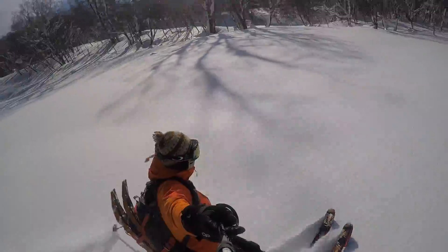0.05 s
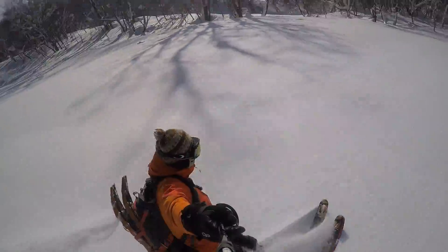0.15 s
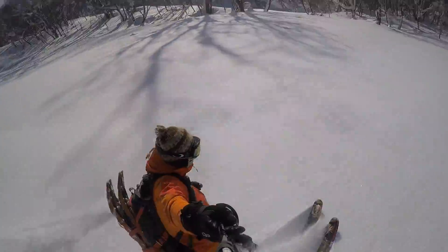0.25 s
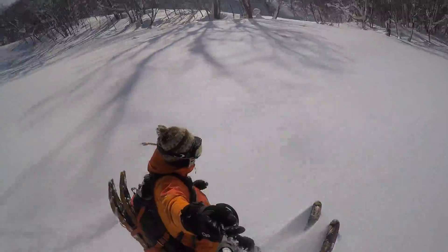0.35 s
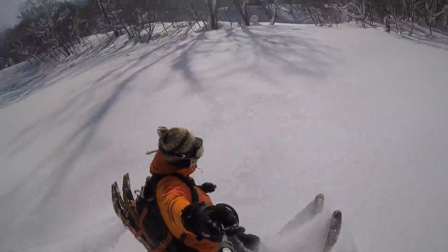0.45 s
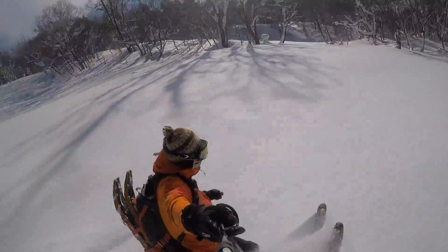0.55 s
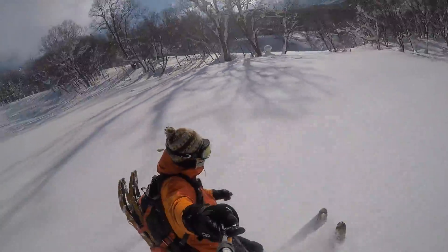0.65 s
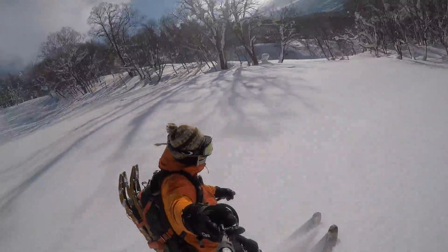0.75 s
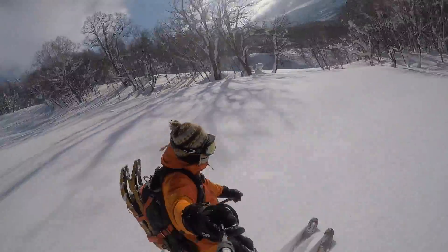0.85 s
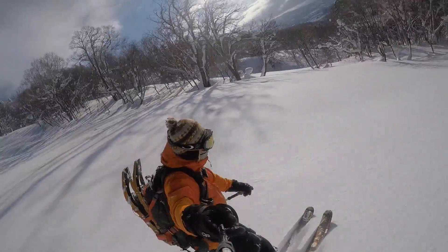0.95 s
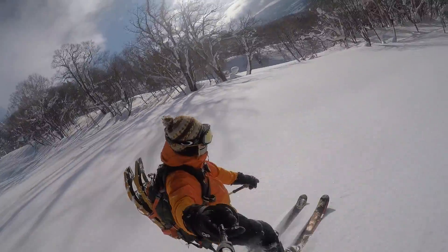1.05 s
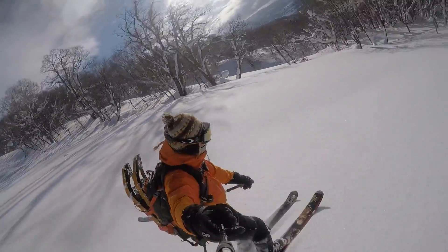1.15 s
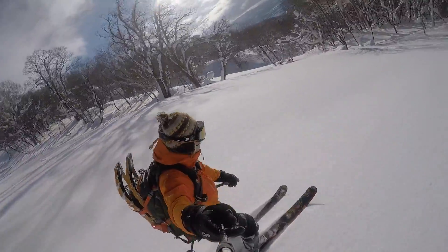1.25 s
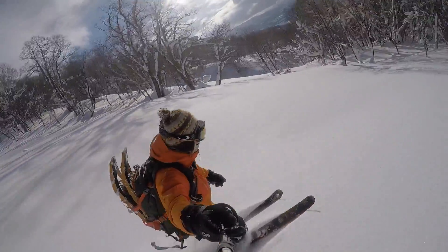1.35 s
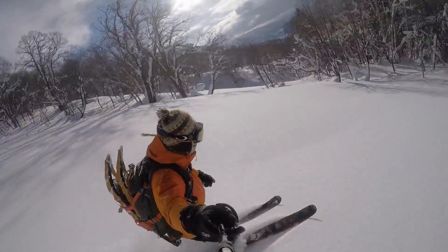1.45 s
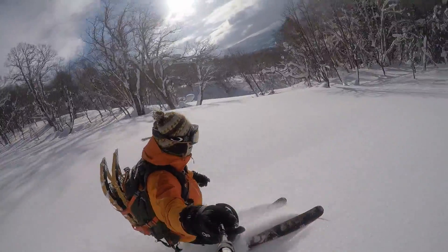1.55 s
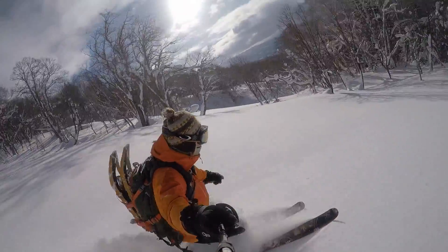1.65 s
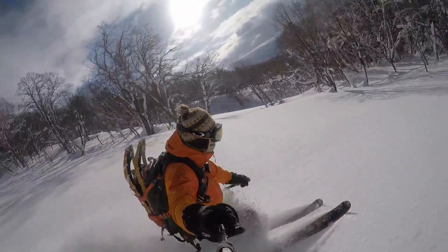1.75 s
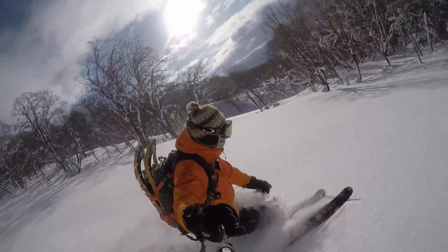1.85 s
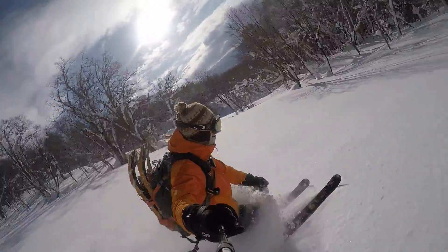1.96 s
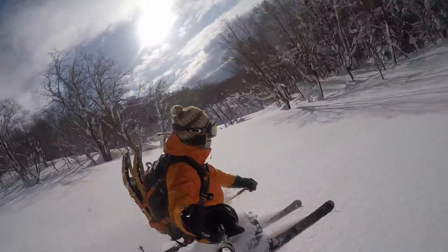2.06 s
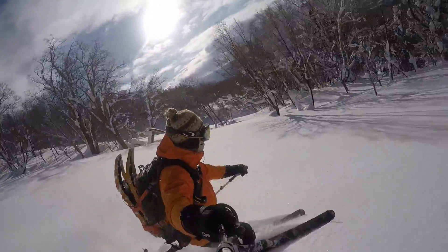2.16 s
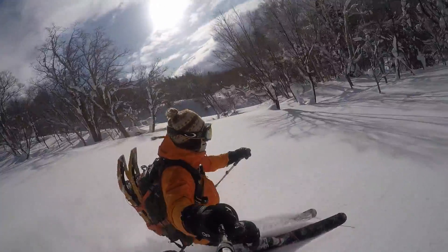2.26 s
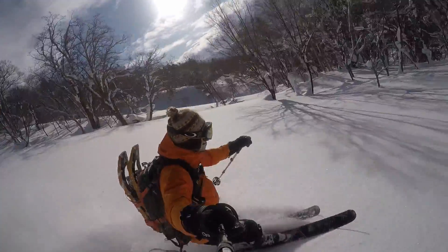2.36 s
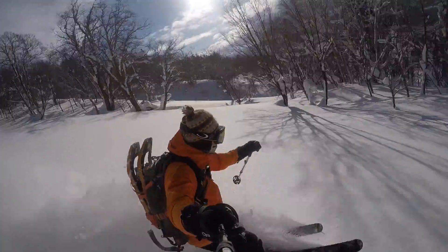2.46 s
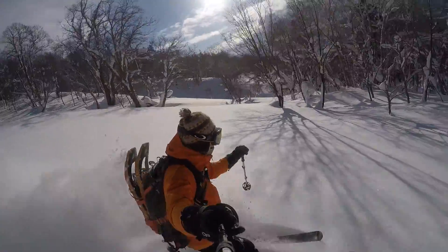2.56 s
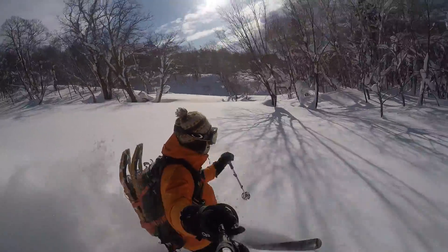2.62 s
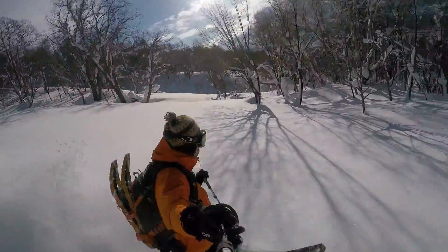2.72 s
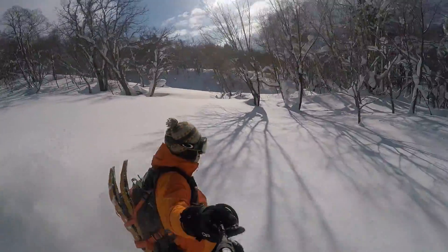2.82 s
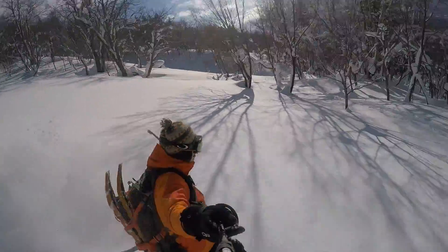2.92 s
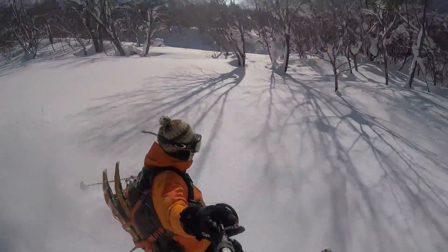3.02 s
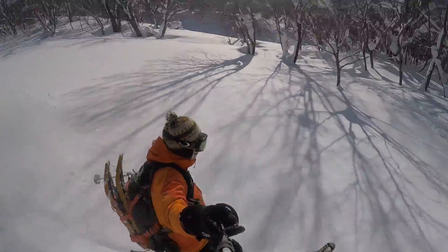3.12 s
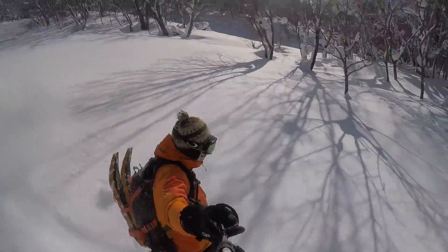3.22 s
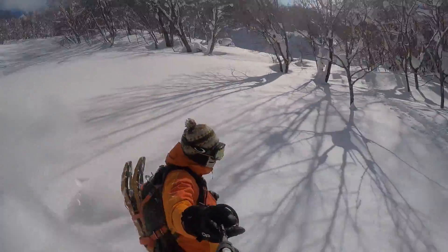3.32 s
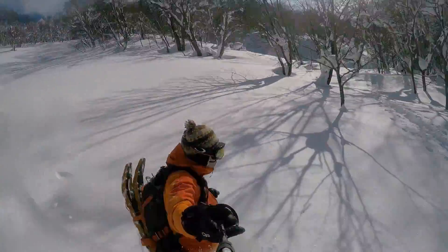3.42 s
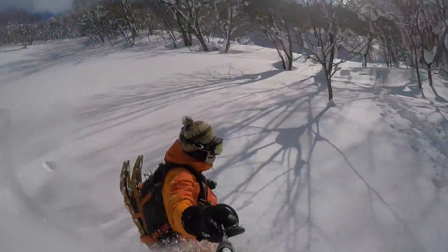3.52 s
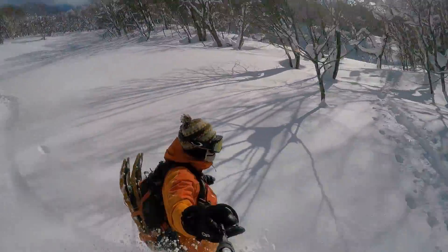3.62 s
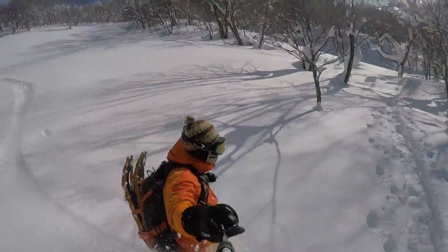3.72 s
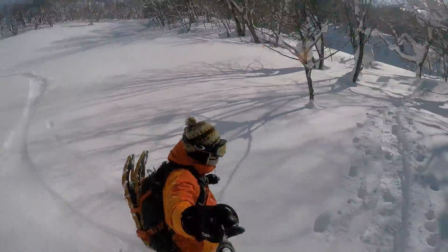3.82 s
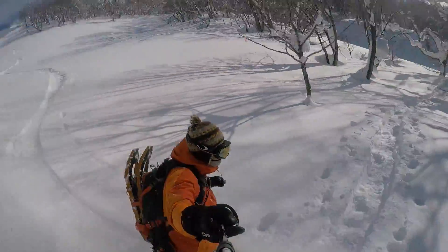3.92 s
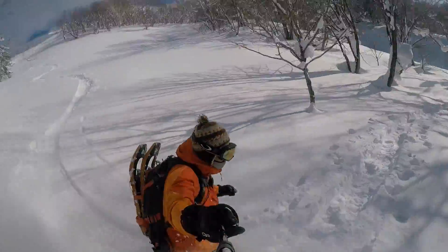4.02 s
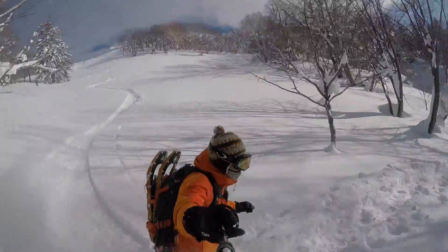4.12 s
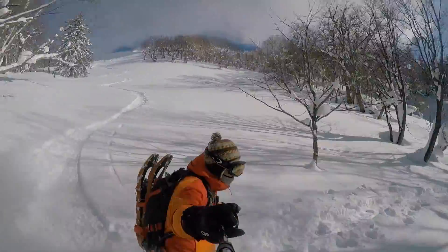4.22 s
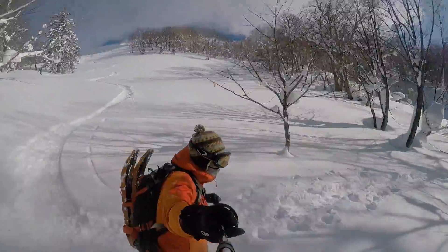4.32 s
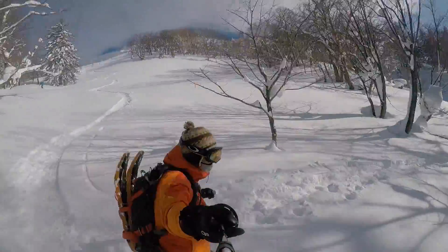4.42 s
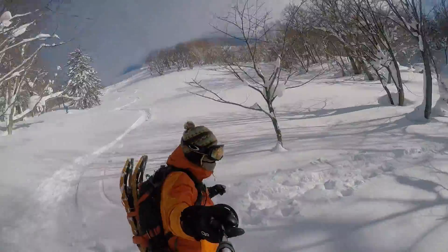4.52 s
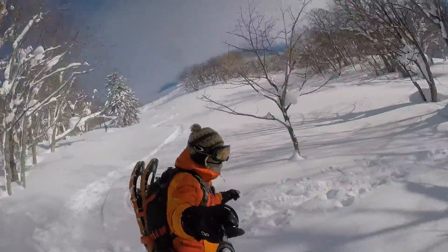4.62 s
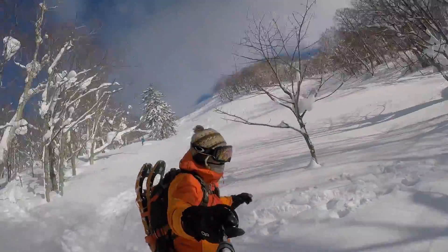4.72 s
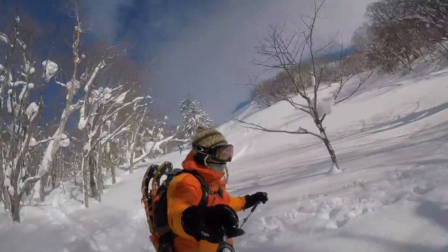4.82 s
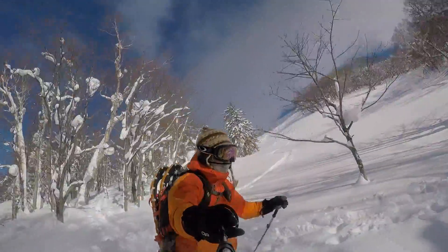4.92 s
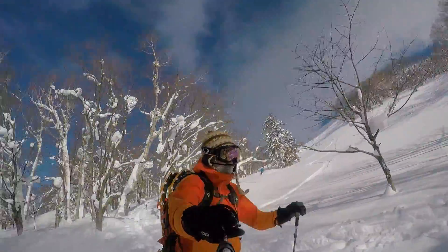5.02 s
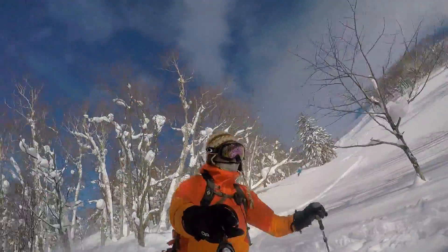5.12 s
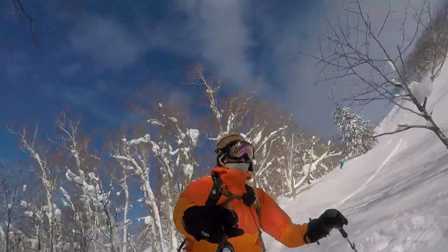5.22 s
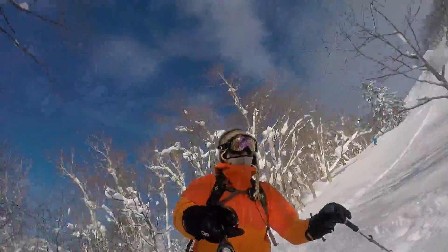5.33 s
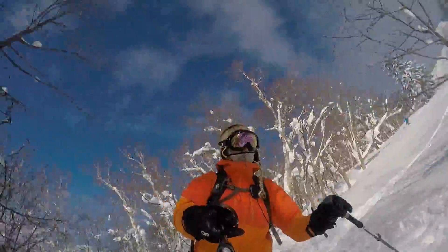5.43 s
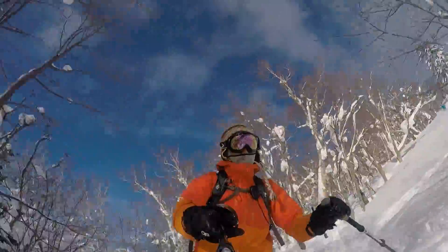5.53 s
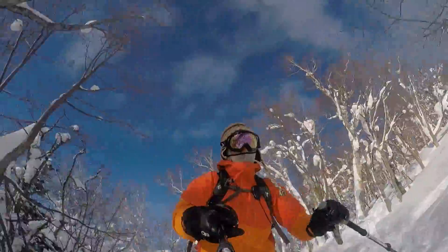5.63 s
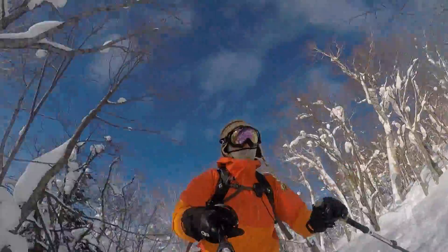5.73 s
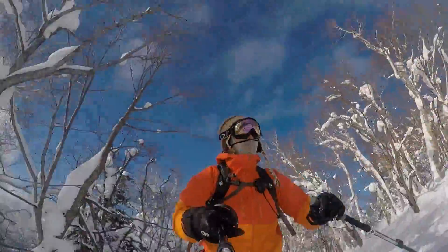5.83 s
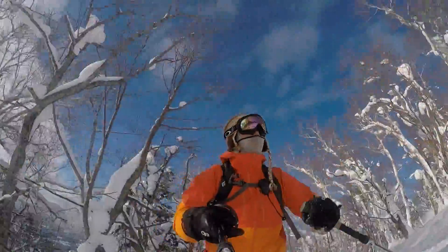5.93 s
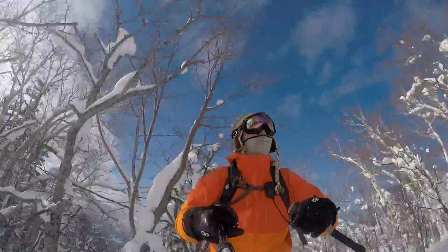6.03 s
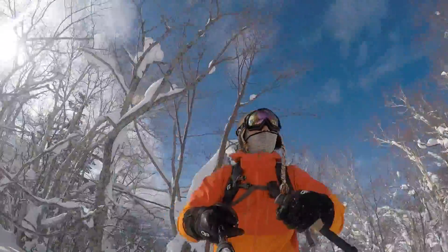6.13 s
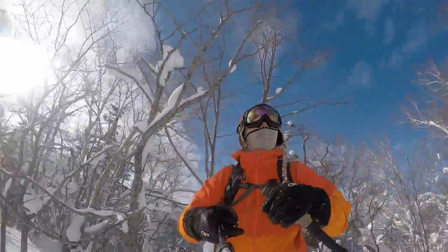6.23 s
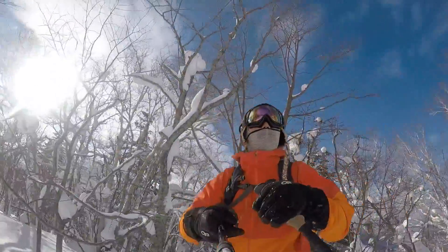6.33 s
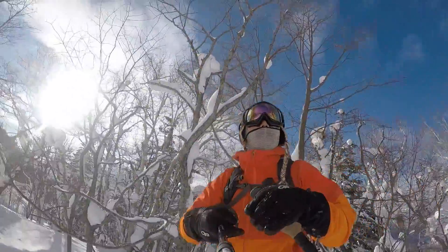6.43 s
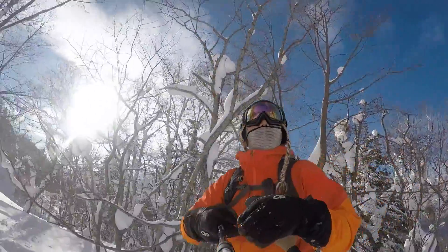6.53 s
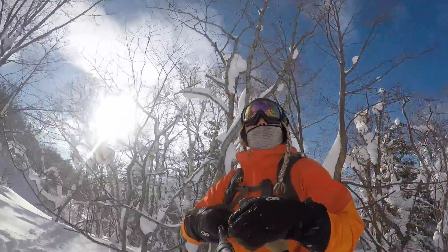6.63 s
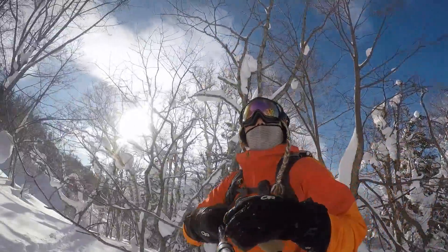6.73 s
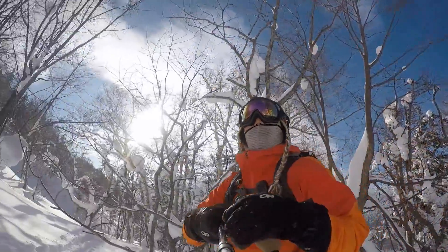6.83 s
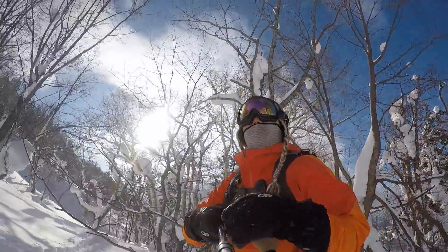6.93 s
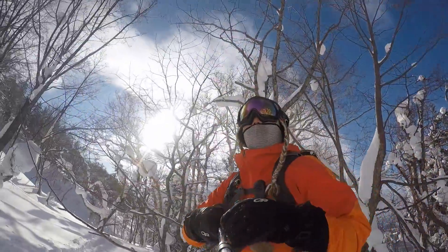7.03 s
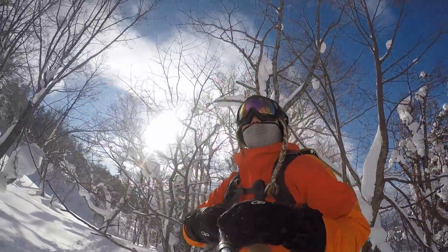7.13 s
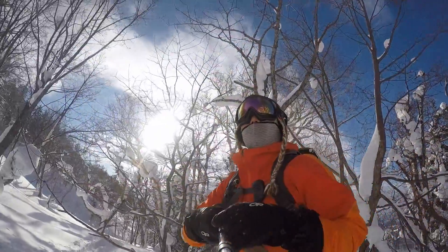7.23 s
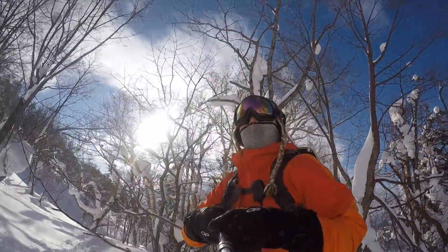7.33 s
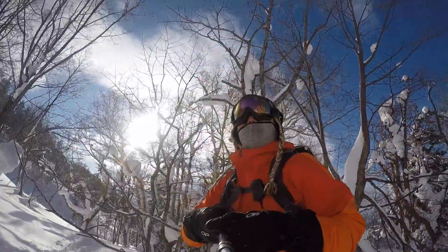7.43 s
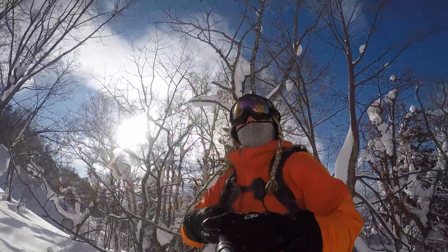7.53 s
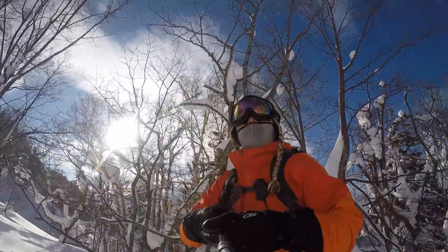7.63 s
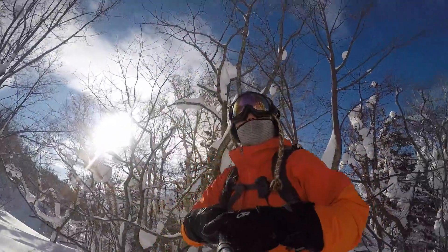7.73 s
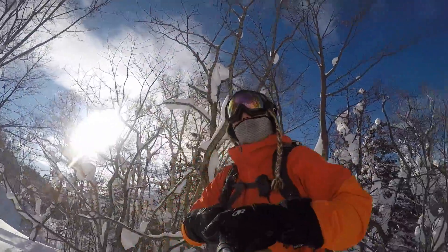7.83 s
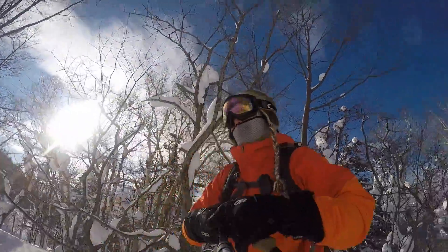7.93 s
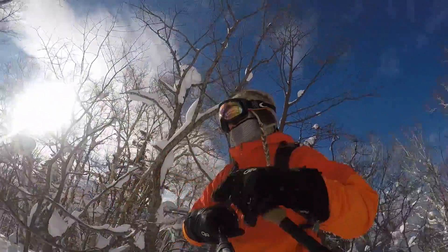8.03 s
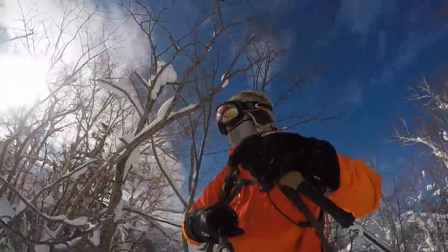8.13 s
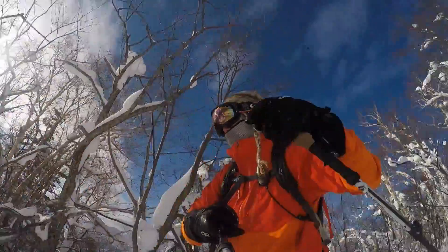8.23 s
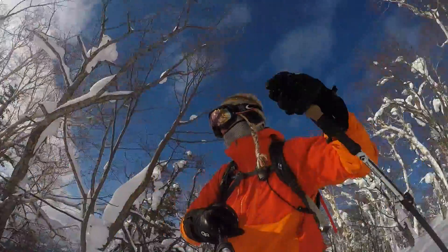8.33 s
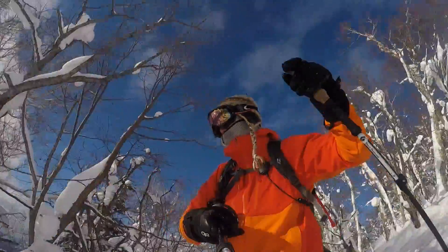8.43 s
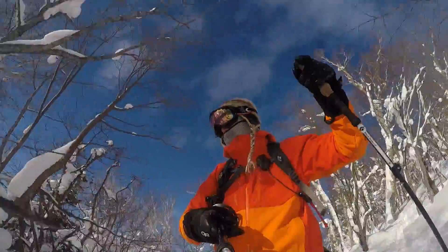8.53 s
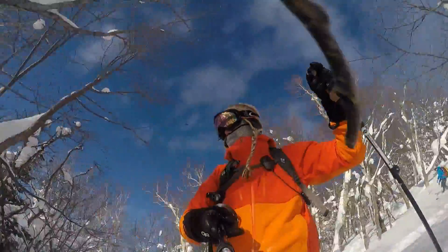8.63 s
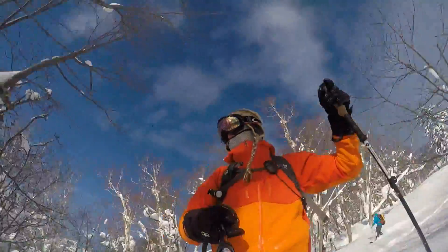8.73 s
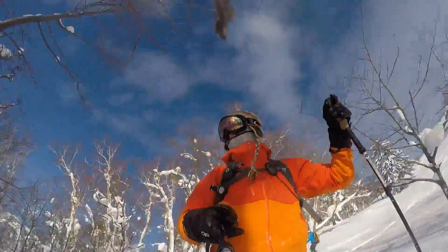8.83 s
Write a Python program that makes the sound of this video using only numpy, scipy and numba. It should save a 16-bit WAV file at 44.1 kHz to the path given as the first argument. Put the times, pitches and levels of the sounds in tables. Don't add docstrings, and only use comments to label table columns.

```python
import sys
import numpy as np
from scipy import signal
from scipy.fft import rfft, irfft
from scipy.io import wavfile
from scipy.ndimage import uniform_filter1d
from numba import njit

SR = 44100
rng = np.random.default_rng(int(sys.argv[2]) if len(sys.argv) > 2 else 0)


def to_wav(sig):
    pcm = np.clip(np.atleast_2d(sig), -1, 1) * 32767
    pcm = np.round(pcm).astype(np.int16)
    wavfile.write(sys.argv[1], SR, pcm.T)


def gain_from_db(level_db):
    decades = np.asarray(level_db, float) / 20
    return 10 ** decades


N = 390814


# time_s, pitch_hz, level_db
VORTEX_TONE = [(0.0, 150.6, -58), (0.2, 145.8, -55.5), (0.55, 111.1, -46.5), (0.97, 104.8, -57),
               (1.35, 116.8, -54), (1.84, 117, -58), (2.57, 122, -56.5), (3.2, 125.2, -57.5),
               (3.36, 111.6, -57.5), (3.68, 105.5, -49.5), (4.07, 87.4, -39), (4.4, 72.3, -76)]
# peak_s, change_db, rise_s, fall_s
GUSTS = [(.1, 5.5, 0.072, 0.2), (1.3, -2.5, 0.17, 0.16), (1.701, 9.5, 0.09, 0.35), (2.24, -8.5, 0.16, 0.28),
         (3.258, 7.5, 0.099, 0.55), (4.25, 9, 0.52, 0.027), (5.44, 7, 0.37, 0.04), (5.9, 6, 0.37, 0.036),
         (6.0, -4, 0.16, 0.3), (7.17, 0, 0.19, 0.12), (7.33, 14, 0.028, 0.15), (6.75, 3, 0.13, 0.25),
         (7.9, 10.5, 0.19, 0.21), (8.13, -5, 0.15, 0.44), (8.8, 5, 0.13, 0.032)]
# frequency_hz, level_db
BUFFET_SPECTRUM = [(11, -26.5), (18, 0), (43, -2.5), (62, -0.5), (106, -14.5), (116, -24.5), (130, -28),
                   (199, -42.5), (300, -41.5), (390, -71.5), (660, -120)]
RIDING_DB, STILL_DB, HALT_S = -47, -52, 4.8
LEE_S, LEE_DB = 3.1, -16
FLUTTER_DB, TAIL_DB, TAIL_SAG_DB_PER_S = -53, -58.5, 2

# time_s, hiss_db
EDGE_PRESSURE = [(0.0, -48.5), (0.58, -48.5), (0.74, -55.5), (0.95, -58), (1.31, -63.5), (1.42, -55.5),
                 (1.59, -51), (1.81, -55.5), (1.92, -64), (2.17, -59.5), (2.32, -52.5), (2.82, -54),
                 (3.12, -49.5), (3.15, -45.5), (3.26, -47), (3.32, -44), (3.345, -45.5), (3.355, -58),
                 (4.12, -63), (4.45, -86)]
# frequency_hz, level_db
HISS_SPECTRUM = [(680, -38.5), (1150, -12), (1250, -11), (1580, 1.5), (2060, 4.5), (2490, 0), (2850, -5),
                 (3240, -4), (3600, -14.5), (4680, -40), (7920, -120)]
SPRAY_SPECTRUM = [(1590, -43.5), (2700, -7), (3230, 0.5), (3520, -6), (4240, 0.5), (4930, -11.5),
                  (5690, -10.5), (6760, -21), (15000, -58)]
CRUNCH_SPECTRUM = [(220, -48), (380, -12), (549, -5), (651, -3.5), (839, -2.5), (936, -0.5), (1250, -11.5),
                   (1620, 2), (2750, -120)]
FIRM_DB = -55
SPRAY_DB, SPRAY_LAW = -68.5, 1.2
CRUNCH_DB, CRUNCH_LAW = -67.5, 0.56
SKID_S, SKID_LENGTH_S, SKID_SPRAY_DB, SKID_CRUNCH_DB = 3.135, 0.202, 4.5, -4

DUST_DB, DUST_LAW, LINT_DB = -89, 1.7, -22.5
DRIFT_DB, CALM_DB, SETTLED_S = -81.5, -98, 5.65
CLOUD_DB, CLOUD_S = 9, 2

# frequency_hz, level_db
SELF_NOISE_SPECTRUM = [(120, -42.5), (200, -8.5), (900, -8.5), (1600, -6.5), (2100, -10.5), (4300, -13.5),
                       (15000, -25.5)]
SELF_NOISE_DB = -76.5
FRAME_HZ, FRAME_START_S = 29.97, 0.0128

# frequency_hz, width_hz, level_db
HOUSING_LOW = [(766, 26, 13), (968, 44, -2)]
HOUSING_MID = [(1540, 110, -2.5), (1506, 62, -7.5)]
HOUSING_HIGH = [(2607, 49, 9.5), (3200, 430, -8.5), (4480, 490, -12), (2200, 140, -1), (5020, 170, -19)]
# time_s, peak_db, place
TICKS = [(0.706, -43, -0.39), (1.378, -30.5, 0.66), (1.516, -48, -0.76), (1.793, -42.5, -0.0059),
         (2.134, -44.5, 0.052), (2.448, -32, 0.72), (2.966, -41, 0.41), (3.83, -45, -0.36),
         (3.871, -40.5, 0.44), (3.908, -45, .52), (3.957, -31, 0.56), (4.315, -47, 0.87), (4.321, -31, 0.6),
         (4.435, -43, 0.31), (4.7255, -42.5, -0.19), (5.203, -57, -0.47), (5.576, -55, 0.58),
         (5.624, -58, 0.43), (5.776, -49, -0.092), (5.807, -46.5, 0.43), (6.272, -61, -0.65),
         (6.902, -61, -0.64), (6.977, -45, -0.032), (8.113, -62.5, .02), (8.345, -50.5, 0.97),
         (8.353, -42, 0.7), (8.43, -39.5, 0.41), (8.674, -49, 0.86), (8.689, -27, 0.49), (8.725, -33, 0.23)]
# time_s, peak_db, place
SETTLING = [(4.677, -60.5, 0.65), (5.321, -66.5, 0.91), (5.401, -64, .02), (5.91, -62, 0.55),
            (4.67, -59, 1.37), (5.147, -66, -0.27), (5.645, -66, 0.48), (5.674, -70, .1),
            (5.732, -66, 0.48), (5.889, -67, 0.68), (6.12, -74, 0.05), (6.496, -71, 0.24),
            (6.57, -60, -0.43), (6.729, -64, -0.046), (6.744, -68, -0.84), (6.829, -61, -0.23),
            (6.927, -58, -0.22), (7.176, -61, -0.041), (8.378, -66, 0.22), (8.473, -72, .9),
            (8.492, -68, .3), (6.425, -68, .02), (7.117, -61, -.6), (7.154, -64, -0.76), (8.251, -61, .45),
            (8.842, -55.5, 0.67)]
# time_s, peak_db, place
CLUSTERS = [(1.743, -41, 0.51), (1.759, -48, 0.78), (2.346, -41, 0.48), (2.352, -36, 0.52),
            (2.357, -33.5, 0.66), (2.365, -34, .6), (2.864, -44, -0.013), (2.869, -45, .9),
            (4.197, -52, -0.29), (4.462, -50, 1), (4.476, -48, 0.78), (4.483, -37, 0.58),
            (4.549, -46, 0.54), (4.562, -48, 0.56), (4.577, -50, 0.3), (4.717, -47.5, 0.031),
            (4.743, -58, 0.26), (8.7, -41, .1), (8.713, -45, 0.46)]
# time_s, peak_db, contact_s, place
RATTLES = [(1.735, -46.5, 0.011, 0.71), (2.347, -43.5, 0.013, 0.07), (2.852, -41.5, 0.0094, 0.89),
           (3.374, -40, 0.0081, 1), (4.141, -46, 0.00486, -0.013), (4.148, -43, 0.0021, 0.96),
           (4.161, -47, 0.0012, 0.78), (4.224, -54, 0.0012, 0.29), (4.483, -48, 0.013, -0.33),
           (4.55, -53, 0.014, 0.13), (4.72, -57, 0.0089, -1), (8.338, -59.5, 0.0096, 0.78)]
CREAK_REACH_DB, TICK_REACH_DB, RATTLE_REACH_DB = 13.5, 18.5, 5.5
TICK_CONTACT_S, TICK_DAMP, TICK_DETUNE = 0.00195, 2.5, 0.03
TICK_CRACK_DB = -10

# time_s, ring_peak_db, deep_peak_db, swing_peak_db, swing_direction
KNOCKS = [
    (1.9165, -26, -55, -31, -1),
    (2.857, -30.5, -50.5, -61, -1),
    (1.9265, -41, -60, -70, 1),
    (7.5375, -22, -30, -60, 1),
    (4.1425, -42, -40, -70, 1),
    (4.149, -33, -38.5, -33.5, 1),
    (7.5325, -6.5, -20.5, -12, 1),
    (8.729, -37, -48, -42.5, 1),
]
# frequency_hz, width_hz, level_db
POLE_BRIGHT = [(820, 55, -24.5), (915, 330, 16), (950, 60, 6), (1057, 70, 0.5), (1470, 120, 10.5),
               (1748, 200, 8.5), (2216, 210, -4.5), (2510, 290, 9), (3040, 220, -19), (4565, 1200, -29.5)]
# frequency_hz, width_hz, level_db
POLE_DEEP = [(312, 98, -5.5), (487, 43, -6.5), (189, 37, -12)]
CHATTER_S, CHATTER = 0.0011, 0.51

# start_s, length_s, level_db, change_to_end_db, place
CREAKS = [(4.149, 0.034, -51, -3.5, -0.57), (4.185, .047, -56, 0.5, -0.41), (4.235, 0.18, -69.5, 5, 0.15),
          (4.424, 0.061, -59, 7, 0.2), (4.458, 0.142, -50.5, -6, 0.34), (4.601, 0.67, -59.5, -43, 0.073),
          (5.1, 0.091, -88, 12, 0.15), (5.141, .07, -74.5, -6, 0.12), (5.2, 0.1, -79, 2.5, -0.15),
          (5.29, .05, -81, -4, -1.3), (5.42, 0.037, -81.5, 0, -1.4), (5.38, .03, -75, 5, .1),
          (5.45, 0.11, -79.5, 1, 0.27), (5.56, 0.095, -69, -6, -0.21), (5.67, 0.042, -73, -2, .2),
          (5.73, 0.11, -80, 10, -0.022), (6.0, 0.14, -78, 3, 0.067), (6.2, 0.18, -86, 8, -0),
          (6.5, 0.21, -72.5, 8, -0.038), (6.69, 0.1, -66.5, -5.5, -0.34), (6.812, 0.058, -67.5, 10, -0.41),
          (6.895, 0.053, -67.5, 3, -.4), (6.96, 0.077, -64, -5, -0.34), (7.04, 0.15, -69.5, -2, 0.18),
          (7.585, 0.074, -63, -6, 1.27), (8.001, 0.3, -83, -5, 0.23), (8.36, .11, -76.5, -9, 0.54),
          (8.47, 0.049, -86, 1, 0.075), (8.645, .04, -78, 8, -.2), (8.686, 0.076, -51, -2, -0.2),
          (8.749, 0.17, -50.5, -22, -0.34)]
CREAK_DRIFT = 0.04

# time_s, rib_rate_hz, level_db
ZIP = [
    (7.15, 229.5, -78),
    (7.2, 237, -77),
    (7.29, 246, -64.5),
    (7.365, 251.9, -56),
    (7.428, 278.2, -54.5),
    (7.476, 309, -49),
    (7.534, 343, -45),
    (7.57, 321.5, -48.5),
    (7.595, 302, -61),
    (7.64, 250, -76),
]
# frequency_hz, level_db
CLOTH_SPECTRUM = [(120, -62), (220, -22), (620, 1), (950, 1.5), (1250, -17), (1800, 2), (2500, -9),
                  (3000, 1.5), (3500, -8.5), (4900, -12), (5500, -47.5), (7100, -23.5), (9000, -63.5)]

# firmest_s, level_db, brightness_db, rise_s, fall_s
RUBS = [
    (7.335, -52.5, -1.5, 0.087, 0.13),
    (7.505, -56.5, -9, .06, .03),
    (7.62, -56.5, 6.5, 0.095, 0.072),
    (7.79, -54, -4.5, 0.15, 0.17),
    (7.955, -53, 0, 0.055, 0.05),
    (8.73, -45, -10.5, 0.064, 0.062),
]
# frequency_hz, level_db
GLOVE_SPECTRUM = [(120, -65), (200, -30), (277, -11), (518, -20), (899, -8), (1320, -9.5), (1450, -4.5),
                  (2040, -3.5), (2230, 3.5), (2430, -6), (3430, -11.5), (4100, -17.5), (7000, -17),
                  (9100, -70), (15400, -120)]
LIGHT_GRIP_DB = -25.5

# frequency_hz, width_hz
WALL_DIPS = [(1290, 129.5), (2040, 120)]
WALL_HZ = 4960


def unit(x):
    return x / np.sqrt(np.mean(x ** 2))


def curves(table):
    s, *columns = np.transpose(table)
    t = np.arange(N) / SR
    inside = 1.0 * ((t >= s[0]) & (t < s[-1]))
    gate = uniform_filter1d(inside, size=300, mode="nearest")
    return [np.interp(t, s, c) for c in columns] + [gate]


def hump(s, rise, fall):
    return np.interp(np.arange(N) / SR, [s - abs(rise), s, s + abs(fall)], [0, 1, 0])


def after(s, turn):
    return np.clip((np.arange(N) / SR - s) / turn, 0, 1)


def walk(rate):
    hold = int(SR / rate)
    steps = np.repeat(rng.standard_normal(N // hold + 1), hold)
    return unit(uniform_filter1d(uniform_filter1d(steps, hold), hold)[:N])


def colour(x, spectrum):
    hz, db = np.transpose(spectrum)
    size = 16384
    grid = np.maximum(np.arange(size // 2 + 1) * SR / size, 1)
    cepstrum = irfft(np.log(gain_from_db(np.interp(np.log(grid), np.log(hz), db))))
    cepstrum[1:size // 2] *= 2
    cepstrum[size // 2 + 1:] = 0
    return signal.fftconvolve(x, irfft(np.exp(rfft(cepstrum))))[:len(x)]


@njit
def svf(x, hz, width, sr):
    y, b, l = np.empty(len(x)), 0., 0.
    for i in range(len(x)):
        g, k = np.tan(np.pi * hz[i] / sr), width / hz[i]
        v = (b + g * (x[i] - l)) / (1 + g * (g + k))
        b, l, y[i] = 2 * v - b, l + 2 * g * v, k * v
    return y


def band(x, hz, width):
    return svf(x + 1e-18, hz + np.zeros(len(x)), float(width), float(SR))


def band_twice(x, hz, width, hz2, width2):
    return band(band(x, hz, width), hz2, width2)


def ring(x, modes, tune=1, damp=1):
    out = 0
    for k, (hz, width, db) in enumerate(modes):
        out = out + (-1) ** k * gain_from_db(db) * band(x, hz * tune, width * damp)
    return out


def grains(rate, spread_db, bed):
    breaks = rng.random(N) < rate / SR
    sizes = gain_from_db(spread_db * np.minimum(rng.exponential(size=N), 5.5))
    return unit(breaks * sizes * rng.choice([-1, 1], N)) + bed * rng.standard_normal(N)


def groups_db(place, reach_db):
    return [-reach_db * abs(place - seat) for seat in (-1, 0, 1)]


def add(track, s, sound):
    i = int(s * SR)
    track[i:i + len(sound)] += sound[:N - i]


def wind():
    rest, lee = after(HALT_S, 0.035), after(LEE_S, 0.43)
    buffet_db = RIDING_DB + (STILL_DB - RIDING_DB) * rest
    for s, change_db, rise, fall in GUSTS:
        buffet_db = buffet_db + change_db * hump(s, rise, fall)
    buffet = unit(colour(rng.standard_normal(N), BUFFET_SPECTRUM)) * gain_from_db(buffet_db + 1.4 * walk(17))

    hz, tone_db, moving = curves(VORTEX_TONE)
    tone = np.sin(2 * np.pi * np.cumsum(hz * (1 + 0.02 * walk(9))) / SR)
    tone = tone * gain_from_db(tone_db + 2.0 * walk(16))

    flutter_db = FLUTTER_DB + LEE_DB * lee - 7 * hump(0, 0.1, 0.43) + 5 * hump(1.55, 0.7, 0.39)
    flutter = unit(band_twice(rng.standard_normal(N), 87, 18, 87, 30))
    flutter = flutter * gain_from_db(flutter_db + 3.0 + 2.0 * walk(8))

    tail_db = TAIL_DB - TAIL_SAG_DB_PER_S * np.arange(N) / SR + 0.62 * LEE_DB * lee
    tail = unit(band_twice(rng.standard_normal(N), 156, 160, 136, 370))
    tail = tail * gain_from_db(tail_db - 4.5 + 2.6 * walk(24.6))
    return buffet + moving * (tone + flutter + tail)


def skis():
    hiss_db, moving = curves(EDGE_PRESSURE)
    pressure_db = hiss_db - FIRM_DB
    skid = after(SKID_S, 0.012) - after(SKID_S + SKID_LENGTH_S, 0.011)
    spray_db = SPRAY_DB + SPRAY_LAW * pressure_db + skid * (SKID_SPRAY_DB + 1.1 * walk(60))
    crunch_db = CRUNCH_DB + CRUNCH_LAW * pressure_db + skid * SKID_CRUNCH_DB
    out = 0
    for level_db, spectrum, breaks_per_s, flicker_hz in (
            (hiss_db - 1.5, HISS_SPECTRUM, 2500, 25),
            (spray_db, SPRAY_SPECTRUM, 3000, 35),
            (crunch_db + 3.5, CRUNCH_SPECTRUM, 900, 20)):
        flicker_db = 0.4 * walk(9) + 1.3 * walk(flicker_hz)
        crystals = grains(breaks_per_s, 2.5, 1.1)
        out = out + unit(colour(crystals, spectrum)) * gain_from_db(level_db + flicker_db)
    return moving * out


def air():
    hiss_db, moving = curves(EDGE_PRESSURE)
    _, zip_db, zipping = curves(ZIP)
    dust = moving * gain_from_db(DUST_DB + DUST_LAW * (hiss_db - FIRM_DB))
    lint = zipping * gain_from_db(zip_db + LINT_DB)
    drift_db = DRIFT_DB + (CALM_DB - DRIFT_DB) * after(SETTLED_S, 0.15)
    drift_db = drift_db + 5.3 * hump(SETTLED_S - 0.15, 0.53, 0.2)
    drift_db = drift_db + CLOUD_DB * hump(SKID_S + SKID_LENGTH_S, 0.23, CLOUD_S)
    hiss = unit(band_twice(rng.standard_normal(N), 7000, 9000, 6400, 12000))
    return hiss * (dust + lint + gain_from_db(drift_db)) * gain_from_db(-8.0 + 0.59 * walk(2.3))


def camera():
    t = np.arange(N) / SR
    frame_phase = (t - FRAME_START_S) * FRAME_HZ % 1
    gate = np.exp(-((frame_phase - 0.1) / 0.036) ** 2)
    chirp = gate * np.sin(2 * np.pi * 8560 * t) * gain_from_db(-81.0 + 2.5 * walk(30))
    hiss = unit(colour(rng.standard_normal(N), SELF_NOISE_SPECTRUM)) * gain_from_db(SELF_NOISE_DB + 1.0)
    return hiss + chirp


def ticks():
    hits = []
    for s, db, place in TICKS + SETTLING + CLUSTERS:
        hits.append((s, db, groups_db(place, TICK_REACH_DB), TICK_CONTACT_S, TICK_DAMP))
    for s, db, contact, place in RATTLES:
        hits.append((s, db, groups_db(place, RATTLE_REACH_DB), contact, 1))

    out, t = np.zeros(N), np.arange(3000) / SR
    for s, db, group_db, contact, damp in hits:
        noise = rng.standard_normal(len(t))
        contact = max(contact, 0.0003)
        push = noise * np.exp(-np.abs(1.3 * (t / contact - 1.1)) ** 3)
        groups = (HOUSING_LOW, HOUSING_MID, HOUSING_HIGH)
        for modes, rel_db, off in zip(groups, group_db, rng.standard_normal(3)):
            hz = modes[0][0]
            tone = band(ring(push, modes, 1 + TICK_DETUNE * np.tanh(off), damp), hz, hz)
            crack = band_twice(push, 0.88 * hz, 950, hz, 1100)
            y = tone / np.abs(tone).max() + crack / np.abs(crack).max() * gain_from_db(TICK_CRACK_DB)
            add(out, s - 0.57 * contact, y * gain_from_db(db + rel_db + 7.0))
    return out


def knocks():
    out, t = np.zeros(N), np.arange(8000) / SR
    blows = 0
    for k in range(3):
        blows = blows + CHATTER ** k * np.exp(-((t - 0.00049 - k * CHATTER_S) / 0.00015) ** 2)
    bright = ring(blows, POLE_BRIGHT)
    bright = bright / np.abs(bright).max()
    deep = ring(np.exp(-((t - 0.002) / 0.0005) ** 2), POLE_DEEP)
    deep = deep / np.abs(deep).max()
    swing = -np.cos(2 * np.pi * 71 * (t - 0.0156)) * np.exp(-((t - 0.016) / 0.011) ** 2)
    swing = swing * np.minimum(t / 0.0053, 1)
    swing = swing + 0.3 * band(swing, 58, 12)
    for s, ring_db, deep_db, swing_db, way in KNOCKS:
        modes = bright * gain_from_db(ring_db) + deep * gain_from_db(deep_db)
        add(out, s, modes + np.sign(way) * swing * gain_from_db(swing_db))
    return out


def creak():
    slips = grains(900, 1.1, 0.32) * gain_from_db(2.0 * walk(60))
    bend = 1 + CREAK_DRIFT * walk(7.3)
    slips = slips * gain_from_db(1.0 * walk(14))

    low = unit(ring(slips, HOUSING_LOW))
    low = low + 2.2 * unit(band_twice(slips, 1010, 420, 850, 470))
    low = unit(low + 1.3 * unit(band_twice(slips, 660, 750, 470, 870)))

    mid = unit(band(ring(slips, HOUSING_MID, bend), 1200, 445))
    mid = unit(mid + 2.1 * unit(band_twice(slips, 1380 * bend, 390, 1600 * bend, 550)))

    high = unit(band(ring(slips, HOUSING_HIGH, 1 + 0.3 * (bend - 1)), 3100, 2300))
    high = high + 0.62 * unit(band_twice(slips, 2760, 1400, 2800, 1600))
    high = high + 0.51 * unit(band_twice(slips, 3150, 350, 3160, 450))
    high = unit(high + 0.12 * unit(band_twice(slips, 4240, 600, 4200, 700)))

    out = 0
    for s, length, db, change_db, place in CREAKS:
        strain_db, on = curves([(s, db), (s + length, db + change_db)])
        low_db, mid_db, high_db = groups_db(place, CREAK_REACH_DB)
        shell = low * gain_from_db(low_db + 7.5) + mid * gain_from_db(mid_db + 2.0) + high * gain_from_db(high_db + 6.5)
        out = out + on * gain_from_db(strain_db) * shell
    return out


def zip_sound():
    hz, db, on = curves(ZIP)
    phase = 2 * np.pi * np.cumsum(hz * (1 + 0.003 * walk(60) + 0.003 * walk(300))) / SR
    ribs = 0
    for k in range(1, 28):
        ribs = ribs + min(k / 4, 1) * gain_from_db(2.0 * walk(25)) * np.cos(k * phase - 0.13 * k ** 2)
    fuzz = 0.65 * (1 + 0.8 * np.cos(phase)) * rng.standard_normal(N)
    drag = unit(ribs) + fuzz
    fingertip = unit(band_twice(drag, 3000, 220, 3000, 220)) * gain_from_db(-68 + 0.2 * (db + 60))
    sleeve = np.cos(phase) * gain_from_db(-71.0 + 0.15 * (db + 55))
    drag = drag - 0.5 * band(drag, 830, 900)
    cloth = unit(colour(drag, CLOTH_SPECTRUM)) * gain_from_db(db + 2.0 + 2.0 * walk(46))
    return on * (sleeve + cloth + fingertip)


def rub():
    drag = colour(grains(1500, 2.2, 0.95) * gain_from_db(1.6 * walk(44)), GLOVE_SPECTRUM)
    dull = unit(band_twice(drag, 800, 1470, 800, 1470))
    bright = unit(band_twice(drag, 2900, 8800, 2900, 8800))
    out = 0
    for s, db, bright_db, rise, fall in RUBS:
        grip = hump(s, rise, fall)
        level = np.minimum(20 * grip, 1) * gain_from_db(db + 1.5 + LIGHT_GRIP_DB * (1 - grip) ** 2)
        out = out + level * (dull + bright * gain_from_db(bright_db - 2.0))
    return out


def scene():
    wall = signal.butter(6, WALL_HZ, fs=SR, output="sos")
    handling = signal.sosfilt(wall, ticks() + creak() + rub())
    for hz, width in WALL_DIPS:
        handling = handling - 0.71 * band(handling, hz, width)
    return (wind() + skis() + air() + camera() + handling + knocks() + zip_sound())[None]


def band_limit(x):
    return signal.sosfilt(signal.butter(12, 15150, fs=SR, output="sos"), x)


def record(dry):
    ceiling = 0.262
    flat = dry / (1 + np.abs(dry / ceiling) ** 14) ** (1 / 14)
    return band_limit(flat)


dry = scene()
out = record(dry)
to_wav(out)
```